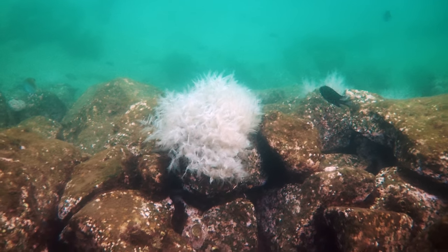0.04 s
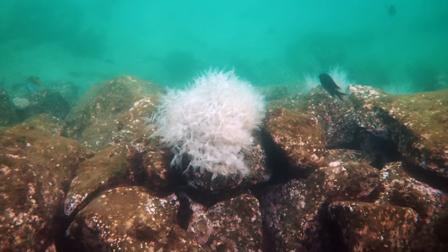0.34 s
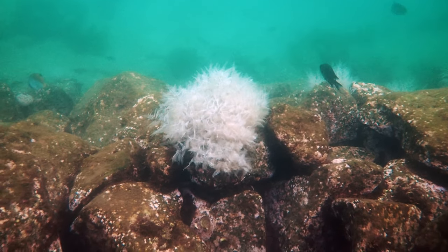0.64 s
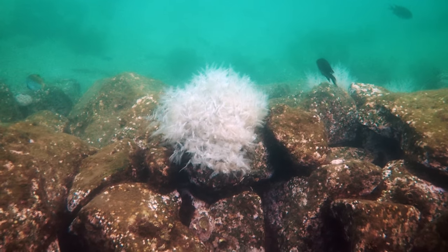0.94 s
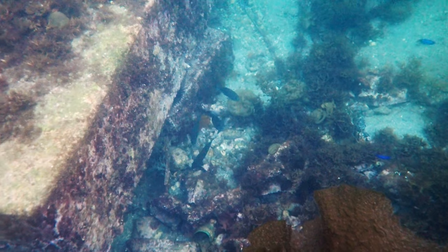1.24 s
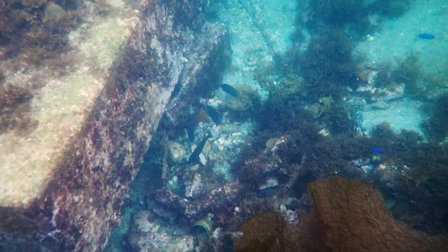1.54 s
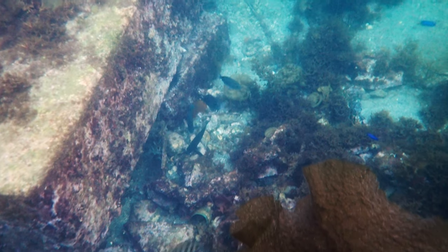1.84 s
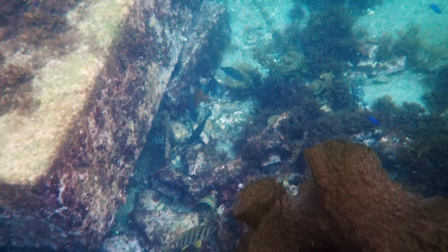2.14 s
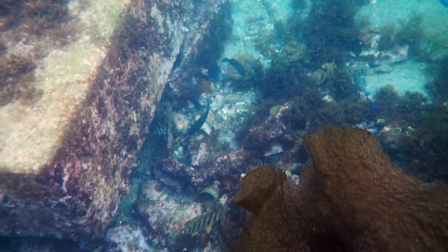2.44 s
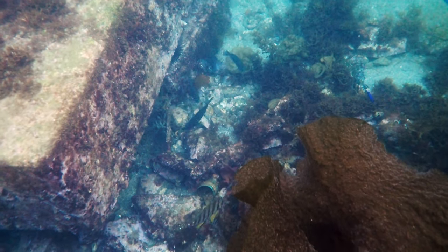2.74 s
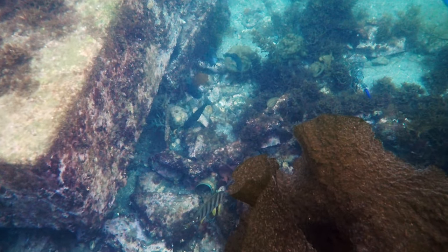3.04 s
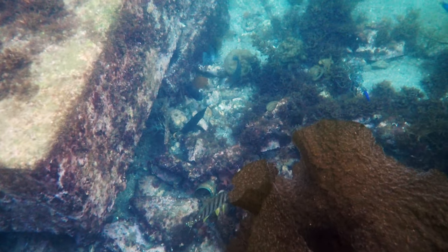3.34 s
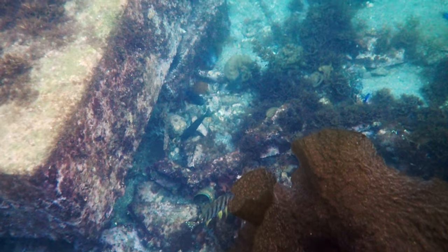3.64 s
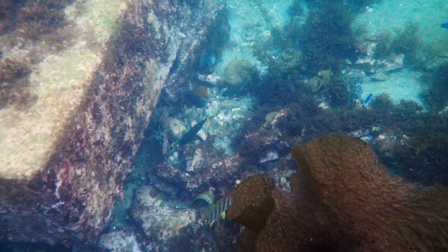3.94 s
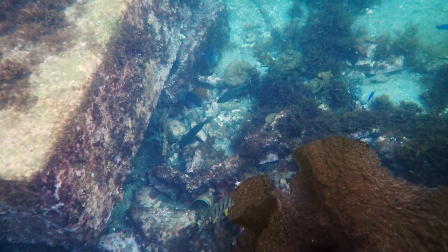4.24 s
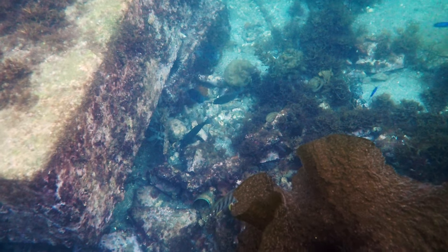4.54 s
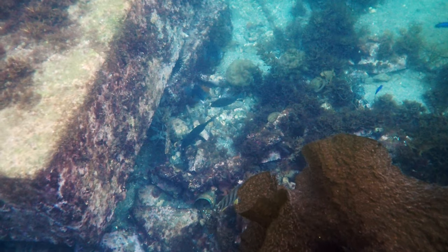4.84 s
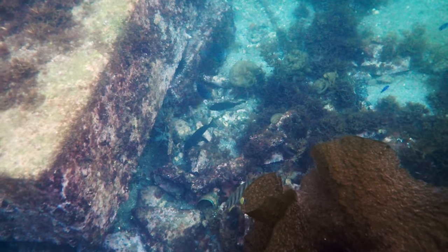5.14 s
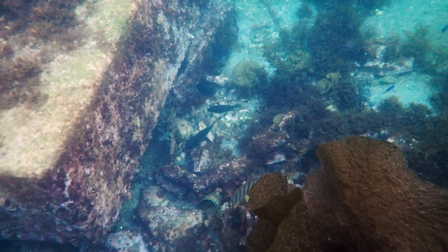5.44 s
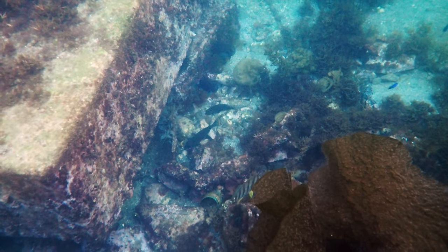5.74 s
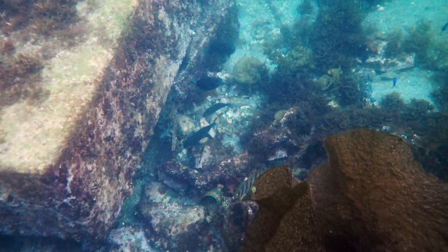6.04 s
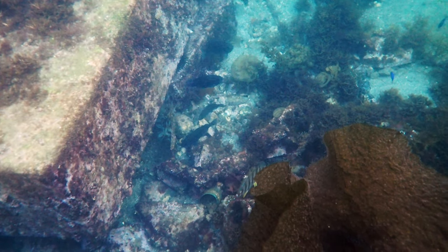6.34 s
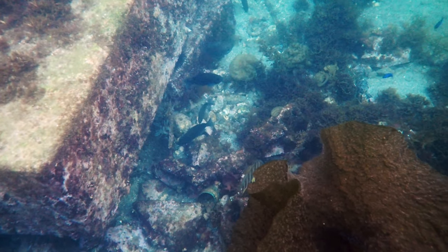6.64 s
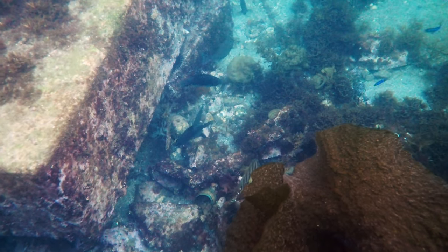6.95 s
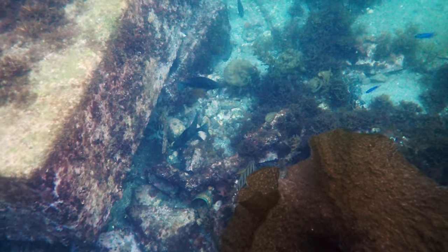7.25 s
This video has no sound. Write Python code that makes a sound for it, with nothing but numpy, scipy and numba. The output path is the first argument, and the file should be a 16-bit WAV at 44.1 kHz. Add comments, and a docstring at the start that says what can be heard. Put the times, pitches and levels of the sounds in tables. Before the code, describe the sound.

For the first second, a distant boat drones underwater, a churning, unevenly throbbing hum with a thin propeller hiss and a bump at 0.5 seconds. At about 1.2 seconds it stops dead, and a quick cluster of hollow knocks on the camera housing follows until 1.5 seconds. What remains is a much quieter, low wash of water with a deep rumble and a faint high fizz. Over it, snapping shrimp make sharp, irregular pops and cracks right to the end, some with short raspy echoes off the rocks. The strongest come around 2, 2.7, 4.9, 5.5, 6.2 and 7 seconds. Light handling bumps are scattered throughout. The loudest sound is a ringing, hollow thump at about 3.2 seconds, and another firm knock lands at 6.1 seconds. Everything has the boxy colour of a microphone inside a watertight housing.

```python
"""A distant boat drones and throbs underwater, heard through the resonances of a watertight camera housing
that drifts over a rocky harbour bed. The drone stops dead after about a second, opening onto a soft wash
of water and snapping shrimp near and far. Each claw snap collapses a bubble: a pop and a bright crack
that echo in the housing and off the rocks. Handling thumps and knocks the housing, ringing its modes,
and the camera's limiter ducks the mix after a loud hit."""
import sys
import numpy as np
from scipy import signal
from scipy.fft import rfft, irfft
from scipy.io import wavfile
from scipy.ndimage import uniform_filter1d, map_coordinates
from numba import njit

SR = 44100
rng = np.random.default_rng(int(sys.argv[2]) if len(sys.argv) > 2 else 0)


def dump_mix(stems):
    """Bounce the given channels to the path in sys.argv[1] as a 16-bit WAV at rate SR."""
    frames = np.atleast_2d(stems).T  # one column per channel
    limited = np.clip(frames, -1, 1)  # hard clip at full scale
    pcm = np.round(limited * 32767).astype(np.int16)
    wavfile.write(sys.argv[1], SR, pcm)


N = 322282
TIME, FREQ = np.arange(N) / SR, np.arange(N // 2 + 1) * SR / N
SHORT = 8192  # samples in one snap with its tail
SHORT_TIME, SHORT_FREQ = np.arange(SHORT) / SR, np.arange(SHORT // 2 + 1) * SR / SHORT
BOAT_STOP_S = 1.181

# EQ of the water's wash: (frequency [Hz], relative level [dB])
WASH_EQ = [(15, -35.5), (25, -23), (54, -4), (106, -15.5), (155, -1), (258, -6.5), (316, 0), (372, -6.5),
           (475, 1.5), (593, -21), (670, -10), (928, -20.5), (2180, -38.5), (2780, -35), (3200, -49),
           (4160, -78), (7040, -120)]
# EQ of the far shrimp's fizz: (frequency [Hz], relative level [dB])
FIZZ_EQ = [(2800, -31), (3500, -4), (4200, -15), (5300, 1), (6500, -5), (7600, 5), (8500, 2), (9300, -9),
           (10200, -3.5), (15500, -5.5)]
# propeller churn through the housing: (frequency [Hz], relative level [dB])
CHURN_EQ = [(30, -35), (43, -11), (58, -18.5), (85, -12), (270, -14.5), (330, 0.5), (410, 0.5), (540, 0.5),
            (610, -0.5), (700, 1), (800, -5.5), (980, -13), (1220, -17.5), (1800, -22.5), (2700, -32),
            (3200, -47.5), (4200, -76)]
# propeller hiss through the housing: (frequency [Hz], relative level [dB])
HISS_EQ = [(2800, -41.5), (3400, -12.5), (4100, -28.5), (5200, -2), (5900, 4.5), (6500, -0.5), (7500, 10.5),
           (8200, -1), (9000, -50.5), (10000, -12.5), (15500, -21)]
# machinery tones: (pitch [Hz], relative level [dB])
MACHINE_TONES = [(344.5, -25.5), (565, -36), (680, -24), (740, -39), (1211, -40.5)]
# swells of the boat's main tone: (crest time [s], level [dB])
BOAT_SWELLS = [(0.057, -5.5), (0.136, -17), (0.198, -14.5), (0.237, -18.5), (.408, -16.5), (0.481, -6.5),
               (.617, -14.5), (0.836, -12.5), (1.005, -16), (1.072, -13.5), (1.162, -15)]
# modes of the housing and its grip: (pitch [Hz], relative level [dB], free t60 [s])
HOUSING_MODES = [(75.7, -2.5, 0.57), (92, -2.5, 0.61), (124, 4.5, 0.14), (157.5, 5.5, 0.3),
                 (182.5, 7, 0.077), (217.3, 6, 0.23), (269.5, 5.5, 0.13), (323, -10.5, 0.02),
                 (436, 6, 0.058), (504, 1, 0.16), (547, -18, 0.18), (621, -2, 0.12), (658, -14.5, 0.23)]
# hits on the housing: (time [s], peak level [dB], contact pitch [Hz], share of free ring time [ratio])
HOUSING_HITS = [(0.526, -7, 228, 0.15), (1.21, -19, 433, 0.27), (1.2634, -0.5, 245, 0.53),
                (1.289, -5.5, 141, 0.78), (1.293, -14.5, 470, .5), (1.357, -0.5, 560, 0.37),
                (1.546, -6.5, 516, 0.38), (2.113, -21.5, 194, 1), (2.637, -11, 208, 0.23),
                (2.906, -18, 270, 0.31), (3.01, -19, 455, 0.57), (3.039, -8.5, 251, 0.059),
                (3.059, -12, 202, 0.21), (3.085, -21, 553, 0.6), (3.159, -8, 520, 0.25),
                (3.175, 2.5, 221, .9), (3.178, -2.5, 656, 0.78), (3.189, -2, 560, 0.48),
                (3.195, -6, 93, 0.89), (3.399, -14.5, 610, .45), (3.487, -14.5, 161, 0.085),
                (3.673, -17, 432, 0.97), (3.741, -13, 497, 0.34), (4.061, -8.5, 260, 0.11),
                (4.237, -12, 222, 0.05), (4.401, -15.5, 378, 0.13), (4.728, -16, 235, 0.44),
                (4.943, -9, 630, 0.34), (5.117, -19.5, 167, 0.39), (6.135, -3, 484, 0.1),
                (6.139, -1, 407, .19), (6.711, -17, 477, .43), (6.973, -11.5, 537, 0.12)]
# colour of a snap through the housing: (frequency [Hz], relative level [dB])
SNAP_EQ = [(40, -45), (120, -42), (250, 1), (500, 12.5), (800, 2.5), (1500, -1), (2700, -3), (3150, -18),
           (3600, -10.5), (4300, -20), (5200, -5.5), (7600, -10.5), (9300, -24.5), (10500, -24.5),
           (16000, -36)]
# bands of a snap's ring, pop, crack and sizzle: (low edge [Hz], high edge [Hz])
SNAP_BANDS = [(300, 700), (700, 3000), (5000, 9000), (10000, 16000)]
# echo tails off the rocks: (time [s], length [s], level [dB], centre [Hz])
SNAP_ECHO_TAILS = [(1.981, 0.14, -41, 1500), (2.215, 0.088, -45, 2020), (2.634, 0.13, -38.5, 1580),
                   (3.634, 0.09, -47.5, 1680), (3.927, 0.15, -50.5, 2100), (4.563, 0.08, -40.5, 1840),
                   (5.543, 0.096, -43.5, 1400), (6.197, 0.064, -50, 1290), (6.419, 0.083, -47, 1960),
                   (7.036, 0.089, -49.5, 2040)]
# close shrimp: (time [s], pop pitch [Hz], pop level [dB], crack level [dB])
NEAR_SNAPS = [(1.134, 711, -18, -29.5), (1.241, 830, -25, -65), (1.359, 1000, -13, -33),
              (1.401, 1100, -24, -68), (1.415, 744, -23, -41), (1.492, 920, -20.5, -71),
              (1.522, 1610, -12.5, -33.5), (1.546, 1130, -23, -45), (1.608, 715, -59, -38),
              (1.833, 813, -40, -33.5), (1.971, 1490, -23.5, -23.5), (1.983, 770, -8, -25.5),
              (2.038, 1400, -15.5, -20.5), (2.219, 766, -27.5, -29.5), (2.238, 710, -17.5, -30),
              (2.287, 710, -30, -39.5), (2.411, 1040, -20.5, -58), (2.465, 703, -30, -34.5),
              (2.509, 1030, -24.5, -56), (2.65, 1120, -25, -36), (2.664, 738, -29, -31),
              (2.695, 1160, -9, -49), (2.735, 1020, -17.5, -38.5), (3.168, 720, -16.5, -35),
              (3.212, 1400, -14.5, -25), (3.318, 904, -43, -33.5), (3.492, 1210, -19.5, -33.5),
              (3.645, 1380, -21, -34), (3.657, 1330, -18.5, -33), (3.879, 840, -26.5, -74),
              (3.926, 795, -36, -22), (3.995, 1440, -20, -37), (4.124, 804, -20.5, -52),
              (4.152, 953, -27, -39.5), (4.346, 830, -34, -38.5), (4.535, 680, -21, -34),
              (4.943, 910, -8, -36), (5.155, 1640, -12.5, -37), (5.242, 880, -37, -39),
              (5.468, 1070, -25.5, -41), (5.539, 990, -8.5, -36), (5.619, 745, -20, -54),
              (5.683, 1080, -23.5, -35), (5.704, 820, -30.5, -23.5), (5.807, 810, -24, -36.5),
              (6.031, 736, -24, -31), (6.074, 665, -22, -36.5), (6.14, 740, -20, -36.5),
              (6.191, 1110, -5.5, -26), (6.442, 760, -24.5, -33), (6.471, 830, -19, -39.5),
              (6.607, 1130, -23, -57), (6.768, 1130, -30.5, -35.5), (6.806, 690, -24, -34),
              (6.827, 694, -26, -40), (6.843, 725, -39, -34), (6.984, 1400, -3.5, -26.5),
              (7.127, 836, -16.5, -40.5)]
# the boat's pan between the microphone ports: (frequency [Hz], left minus right [dB])
BOAT_PAN = [(60, 0.5), (110, -0.5), (200, 1), (380, -2), (700, 4), (1290, -0.5), (2380, 0), (4400, 10.5),
            (8120, -7), (15000, 8)]
# the boat's phase between the ports: (frequency [Hz], left lead [rad])
BOAT_PHASE = [(300, 0.099), (500, -0.73), (800, -0.015), (3000, 0.034), (5000, -0.3), (6800, -0.88),
              (8000, -0.45)]
# pan of the reef and the knocks: (frequency [Hz], left minus right [dB])
REEF_PAN = [(60, 2.5), (110, -5), (200, 2.5), (380, -8), (700, 7.5), (1200, 0), (2400, -0.5), (4400, 4),
            (8000, 1)]
# phase of the reef and the knocks: (frequency [Hz], left lead [rad])
REEF_PHASE = [(260, .1), (520, 1.4), (1000, -.1), (1900, .5), (2800, .3), (4300, 3.7), (5300, 4.5),
              (7500, 6.2), (16000, 8.5)]
# how mono diffuse sound is: (frequency [Hz], left-right correlation [ratio])
CORRELATION = [(30, 0.81), (150, 0.99), (1000, 0.99), (2500, 0.84), (5500, 0.48), (8000, 0.51),
               (14000, 0.18)]


def undb(db):
    """Decibels to gain."""
    return 10 ** (np.asarray(db) / 20)


def unit(x):
    """Scale to rms 1."""
    return x / np.sqrt(np.mean(x ** 2))


def curve(points, freq):
    """Join (frequency [Hz], value) breakpoints on a log-frequency axis."""
    hz, value = np.transpose(points)
    return np.interp(np.log(freq + 1), np.log(hz), value)


def resonance(freq, hz, width_hz):
    """Gain of one resonance, 1 at its centre."""
    return 1 / np.sqrt(1 + ((freq ** 2 - hz ** 2) / (width_hz * (freq + 1))) ** 2)


def drift(rate_hz):
    """Random modulator: sample-and-hold, slewed twice, rms 1."""
    hold = int(SR / rate_hz)
    steps = np.repeat(rng.standard_normal(N // hold + 1), hold)
    return unit(uniform_filter1d(uniform_filter1d(steps, hold), hold)[:N])


def diffuse(gain):
    """Stereo noise with the given spectrum, narrow in the bass and wide in the treble; rms 1."""
    alike = np.clip(curve(CORRELATION, FREQ), 0, 1)
    mid, side = rfft(rng.standard_normal((2, N))) * gain * np.sqrt([1 + alike, 1 - alike])
    return unit(irfft(np.array([mid + side, mid - side]), N))


def sharp_click(gain):
    """The tightest (minimum-phase) click with the given spectrum."""
    cepstrum = irfft(np.log(gain + 1e-9))
    cepstrum[1:SHORT // 2] *= 2
    cepstrum[SHORT // 2 + 1:] = 0
    return irfft(np.exp(rfft(cepstrum)))


def fade(t, t60):
    """Exponential decay, 60 dB down after t60."""
    return np.exp(-np.log(1000) * t / t60)


def add(out, s, sound):
    """Mix a sound in from time s."""
    start = max(int(s * SR), 0)
    part = out[:, start:start + sound.shape[-1]]
    part += sound[..., :part.shape[1]]


def ports(x, pan, phase):
    """Stereo image: the housing wall reaches the two ports with different strength and phase."""
    half = undb(curve(pan, FREQ) / 2) * np.exp(.5j * curve(phase, FREQ))
    return irfft(rfft(x) * np.array([half, 1 / half]), N)


def rock_ripple(width_hz):
    """Smooth random EQ peaks and dips left by the paths between rocks; spread near 1."""
    points = rng.standard_normal(SHORT // 2 + 3)
    return map_coordinates(points, [SHORT_FREQ / max(width_hz, 50)], order=3, mode="nearest")


def scatter(wall_db, wall_t60, near_db, near_t60, far_db, far_t60):
    """Stereo spectrum of the direct path, wall smear, near housing echoes and a grainy far rock tail."""
    near_noise, far_noise, grain, sides, wall_noise = rng.standard_normal((5, SHORT))
    wall = unit(wall_noise * fade(SHORT_TIME, wall_t60))
    near = unit(near_noise * fade(SHORT_TIME, near_t60) * (SHORT_TIME > .0006))
    bloom = 1 - fade(SHORT_TIME, 0.03)
    far = unit(far_noise * undb(13.2 * grain) * fade(SHORT_TIME, far_t60) * bloom)
    echoes = (undb(near_db) * near + undb(far_db) * far) / np.sqrt(SHORT)
    # the wall smears the crack; the brightest tip passes cleanly
    wall_eq = undb(wall_db) * resonance(SHORT_FREQ, hz=5500, width_hz=7100) ** 2
    smear = wall_eq * rfft(wall) / np.sqrt(SHORT)
    alike = np.clip(curve(CORRELATION, SHORT_FREQ), 0, 1)
    mid = 1 + smear + rfft(echoes) * np.sqrt(alike)
    side = rfft(echoes * np.sign(sides)) * np.sqrt(1 - alike)
    return np.array([mid + side, mid - side])


def rumble(start_db=-44, fall_db_per_s=3):
    """A deep rumble of water round the housing that slowly settles."""
    settled_s = np.maximum(TIME - BOAT_STOP_S, 0)
    return diffuse(resonance(FREQ, hz=55, width_hz=99) ** 2) * undb(start_db - fall_db_per_s * settled_s)


def water(wash_db=-34, hollow_db=-39, fizz_db=-51.5):
    """The bed: a low, restless wash that rings the housing, under the even fizz of countless far shrimp."""
    surge_db, ring_db = 1.7 * drift(22), 3.5 * drift(30)
    wash = diffuse(undb(curve(WASH_EQ, FREQ))) * undb(wash_db + surge_db)
    hollow = diffuse(resonance(FREQ, hz=490, width_hz=120) ** 2) * undb(hollow_db + ring_db)
    fizz = diffuse(undb(curve(FIZZ_EQ, FREQ))) * undb(fizz_db + 0.27 * drift(28))
    return wash + hollow + fizz


def colony(spread_db, centre_hz, pitch_spread, width, shrimp, snaps_each):
    """Shrimp further off, each with its own pitch and echoes, snapping at random; rms 1."""
    out = np.zeros((2, N))
    for _ in range(shrimp):
        hz = centre_hz * np.exp(pitch_spread * rng.standard_normal())
        colour = undb(curve(SNAP_EQ, SHORT_FREQ) + 2 * rock_ripple(width_hz=1100))
        colour *= resonance(SHORT_FREQ, hz, width * hz) ** 2
        paths = scatter(wall_db=2.5, wall_t60=0.008, near_db=1, near_t60=.025, far_db=0, far_t60=.17)
        click = unit(irfft(rfft(sharp_click(colour)) * paths))
        # most snaps are faint, a few stand out
        strength = np.minimum(rng.exponential(size=snaps_each), 2.5)
        for s, db in zip(rng.random(snaps_each) * TIME[-1], spread_db * strength):
            add(out, s, undb(db) * click)
    return unit(out)


def echo_tails(grains_per_s=900, crack_db=-7):
    """Grainy, rasping echo tails off the rocks and surface."""
    out = np.zeros((2, N))
    cracks = undb(crack_db) * resonance(SHORT_FREQ, hz=7500, width_hz=2900) ** 2
    for s, length, db, hz in SNAP_ECHO_TAILS:
        grains = rng.standard_normal(SHORT) * (rng.random(SHORT) < grains_per_s / SR)
        grains *= np.sin(np.pi * np.minimum(SHORT_TIME / length, 1))
        body = resonance(SHORT_FREQ, hz, 1.45 * hz) ** 3
        click = sharp_click(undb(curve(SNAP_EQ, SHORT_FREQ)) * (body + cracks))
        paths = scatter(wall_db=-12, wall_t60=0.0035, near_db=2, near_t60=0.012, far_db=1, far_t60=0.054)
        rasp = signal.fftconvolve(grains[None], irfft(rfft(click) * paths), axes=1)
        add(out, s, undb(db) * rasp * np.sqrt(2 * length * SR / np.sum(rasp ** 2)))
    return out


def wavering_tone(hz, wander_hz, rate_hz):
    """A sine whose pitch strays at random; rms 1."""
    return np.sqrt(2) * np.sin(2 * np.pi * np.cumsum(hz + wander_hz * drift(rate_hz)) / SR)


def swells(floor_db=-21.5, half_width_s=0.011):
    """Gain of the boat's main tone: a low steady level with brief bell-shaped swells."""
    crests = sum(undb(db) * np.exp(-((TIME - s) / half_width_s) ** 2) for s, db in BOAT_SWELLS)
    return undb(floor_db) + crests


def boat(churn_db=-18, hiss_db=-38):
    """Propeller noise and unsteady machinery tones; each swell throbs the main tone and lifts the hiss."""
    effort, throb = drift(12.64), swells()
    churn = diffuse(undb(curve(CHURN_EQ, FREQ))) * undb(churn_db + effort + 1.57 * drift(45.1))
    hiss = diffuse(undb(curve(HISS_EQ, FREQ))) * undb(hiss_db + 5 * throb + 1.4 * drift(60.9))
    main_tone = wavering_tone(hz=497, wander_hz=19, rate_hz=90) * undb(1.3 * drift(90))
    machinery = sum(wavering_tone(hz, wander_hz=4.95, rate_hz=40) * undb(db - 3.5 + 3 * drift(25.9))
                    for hz, db in MACHINE_TONES)
    return ports(churn + hiss + main_tone * throb + machinery, BOAT_PAN, BOAT_PHASE)


def grip_bumps(count=16, peak_db=-28, spread_db=5.5, contact_hz=320, pitch_spread=0.41, ring_share=.3):
    """Faint random bumps of the grip, as extra rows of housing hits."""
    times = rng.uniform(BOAT_STOP_S, TIME[-1], count)
    return [(s, peak_db + spread_db * force, contact_hz * np.exp(pitch_spread * hardness), ring_share)
            for s, (force, hardness) in zip(times, rng.standard_normal((count, 2)))]


def knocks(width=0.8):
    """Each hit wakes the housing's modes near the pitch of its contact; the grip damps them."""
    out, t = np.zeros((2, N)), TIME[:SR // 2]
    hz, db, t60 = np.transpose(HOUSING_MODES)[:, :, None]
    for s, peak_db, contact_hz, ring_share in HOUSING_HITS + grip_bumps():
        detune = 1 + 0.0076 * rng.standard_normal(hz.shape)
        weight = undb(db) * resonance(hz, contact_hz, width * contact_hz) ** 2
        decay = fade(t, t60 * max(ring_share, .05))
        ring = np.sum(weight * np.sin(2 * np.pi * hz * detune * t) * decay, axis=0)
        # a soft contact builds up over about a cycle and leaves no deep boom
        ring *= 1 - np.exp(-(t * contact_hz) ** 2)
        ring = signal.sosfilt(signal.butter(2, 0.52 * contact_hz, "high", fs=SR, output="sos"), ring)
        add(out, s, undb(peak_db) * ring / np.abs(ring).max())
    return out


def snap(hz, pop_db, crack_db):
    """A bubble collapses: a pop that rings the housing and a crack with a bright sizzle, plus echoes."""
    # the duller the snap, the more it gathers round its pop pitch
    pitched = undb(.4 * (pop_db - crack_db)) * resonance(SHORT_FREQ, hz, .48 * hz) ** 2
    colour = undb(curve(SNAP_EQ, SHORT_FREQ) + 2.96 * rock_ripple(width_hz=650)) * (1 + pitched)
    colour *= 1 + .5 * resonance(SHORT_FREQ, hz=455, width_hz=31)
    paths = scatter(wall_db=-2.5, wall_t60=0.0077, near_db=-1.5, near_t60=0.029, far_db=-9, far_t60=0.18)
    # four-band EQ: the ring follows the pop, the sizzle follows the crack
    target_db = np.array([pop_db - 5.5, pop_db, crack_db, crack_db - 13.5])
    power = (colour * np.abs(paths.mean(axis=0))) ** 2 / (SHORT * 0.0012 * SR)  # as a 1.2 ms burst
    band_power = [power[(SHORT_FREQ > low) & (SHORT_FREQ < high)].sum() for low, high in SNAP_BANDS]
    trim_db = target_db - 10 * np.log10(band_power)
    centres_hz = np.sqrt(np.prod(SNAP_BANDS, axis=1))
    colour *= undb(curve(np.transpose([centres_hz, trim_db]), SHORT_FREQ))
    return irfft(rfft(sharp_click(colour)) * paths)


def near_shrimp(delay_s=.0008):
    """Foreground claw snaps, each with its own pitch and bite."""
    out = np.zeros((2, N))
    for s, hz, pop_db, crack_db in NEAR_SNAPS:
        add(out, s + delay_s, snap(hz, pop_db, crack_db))
    return out


def scene(crossfade_s=0.0087):
    """The boat cuts to the reef bed; close snaps, echo tails and knocks sit on top."""
    running = np.clip((BOAT_STOP_S - TIME) / crossfade_s + .5, 0, 1)
    pops = colony(spread_db=10, centre_hz=1090, pitch_spread=0.28, width=0.99, shrimp=48, snaps_each=7)
    ticks = colony(spread_db=9.5, centre_hz=7130, pitch_spread=0.24, width=0.48, shrimp=36, snaps_each=4)
    reef = (1 - running) * (water() + rumble() + undb(-45.5) * pops + undb(-54) * ticks)
    drone = running * boat()
    return drone + ports(reef + near_shrimp() + echo_tails() + knocks(), REEF_PAN, REEF_PHASE)


@njit
def follow(x, attack, release):
    """Envelope follower; attack and release are shares of the gap closed per sample."""
    out, level = np.empty(len(x)), 0.
    for i in range(len(x)):
        level += (x[i] - level) * (attack if x[i] > level else release)
        out[i] = level
    return out


def record(dry, ceiling=0.75, attack_s=0.00025, release_s=0.15, top_hz=16200):
    """The camera's limiter ducks the mix after a loud hit; the fastest peaks clip, and the top is cut."""
    envelope = follow(np.abs(dry).max(axis=0), 1 / (attack_s * SR), 1 / (release_s * SR))
    limited = dry * ceiling / np.maximum(envelope, ceiling)
    high_cut = signal.ellip(8, .2, 70, top_hz, fs=SR, output="sos")
    return signal.sosfilt(high_cut, np.clip(limited, -1, 1))


dry = scene()
out = record(dry)
dump_mix(out)
```